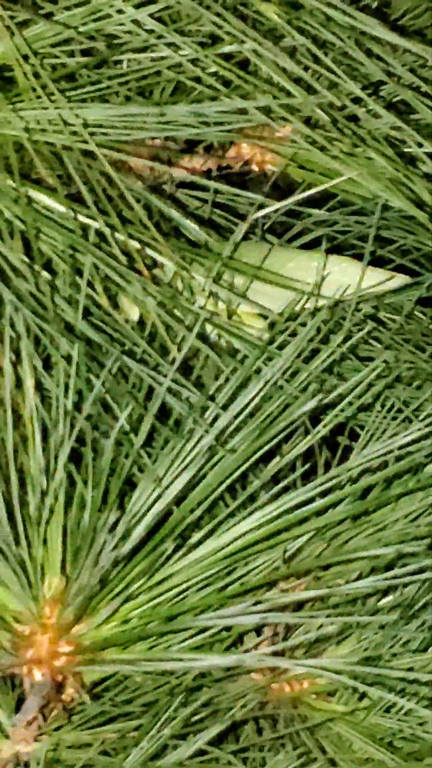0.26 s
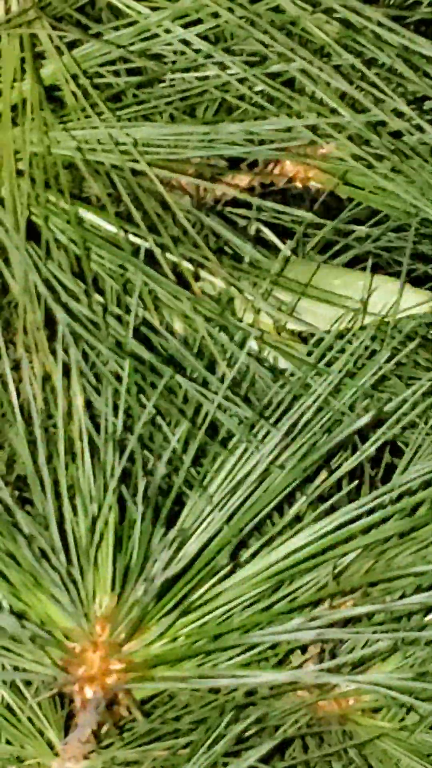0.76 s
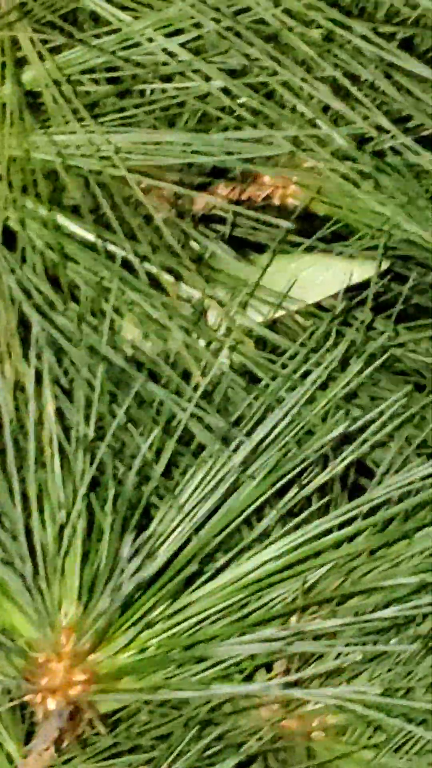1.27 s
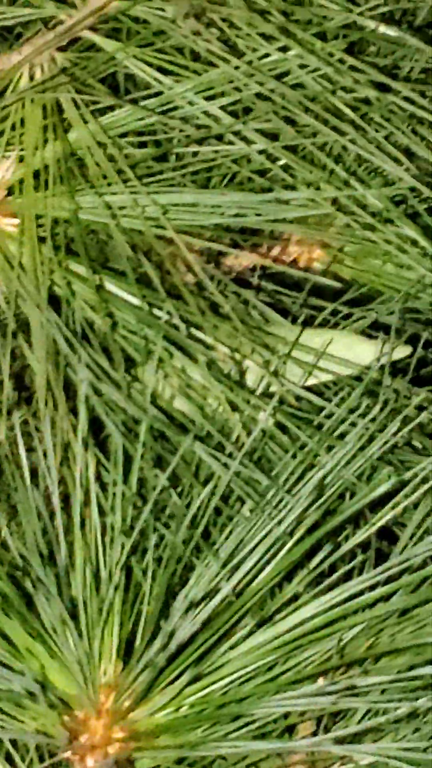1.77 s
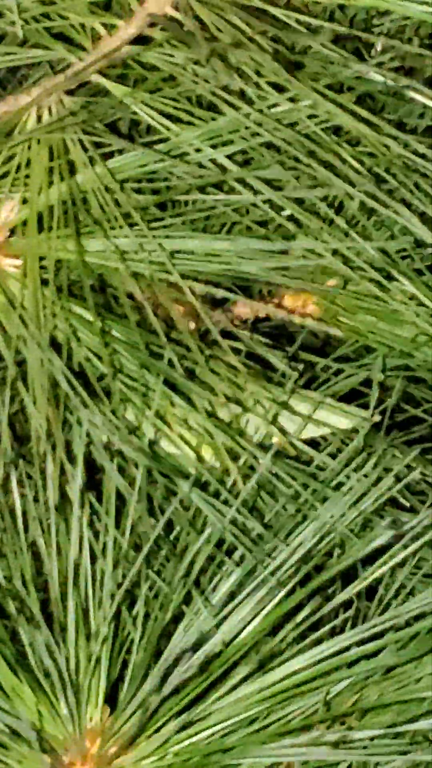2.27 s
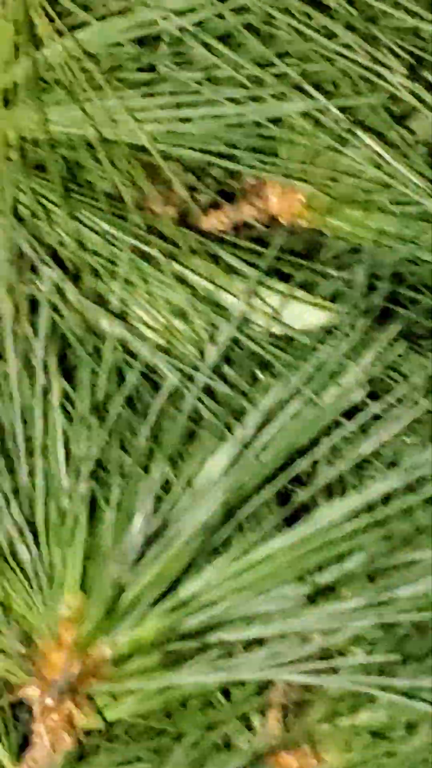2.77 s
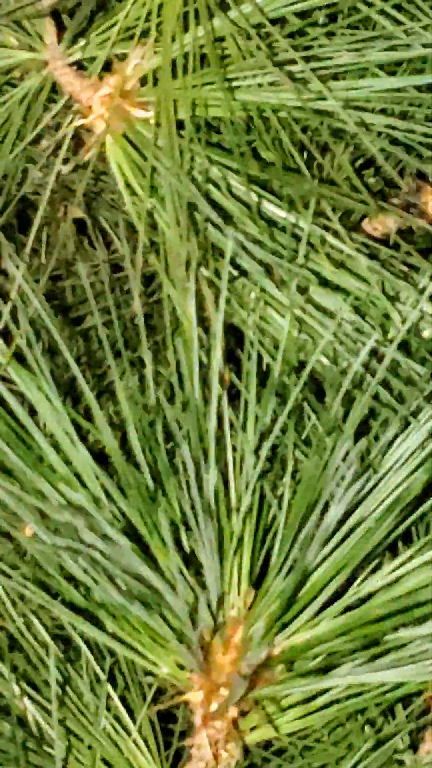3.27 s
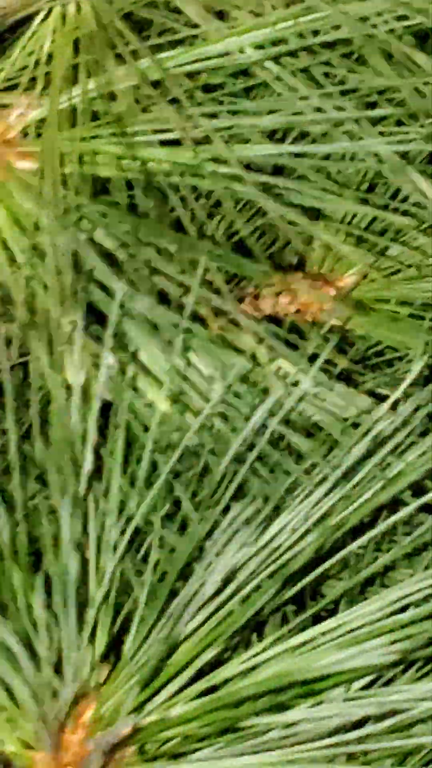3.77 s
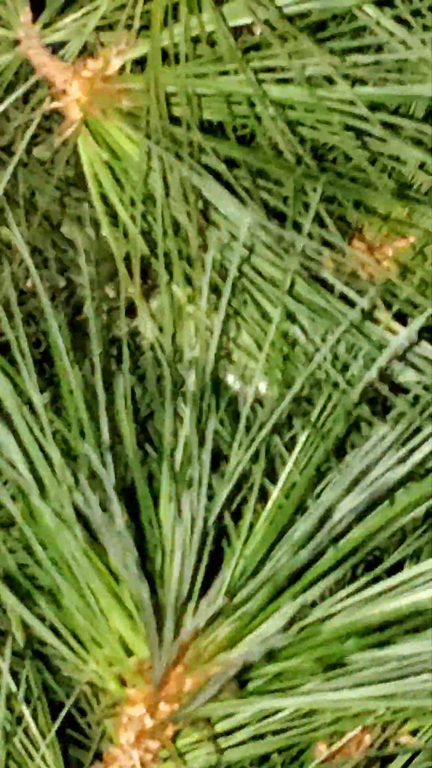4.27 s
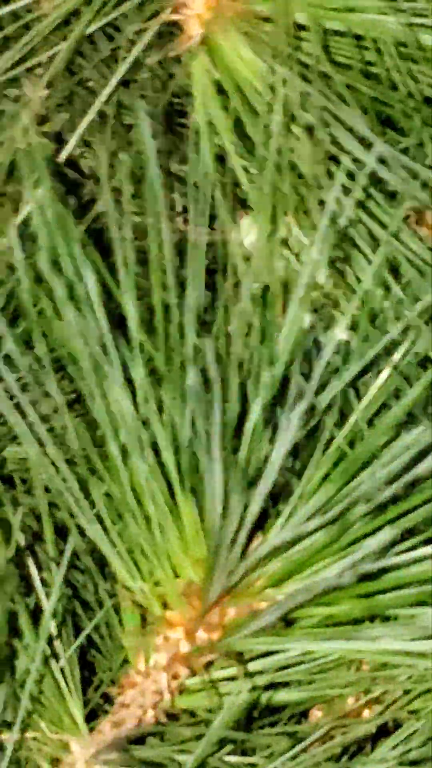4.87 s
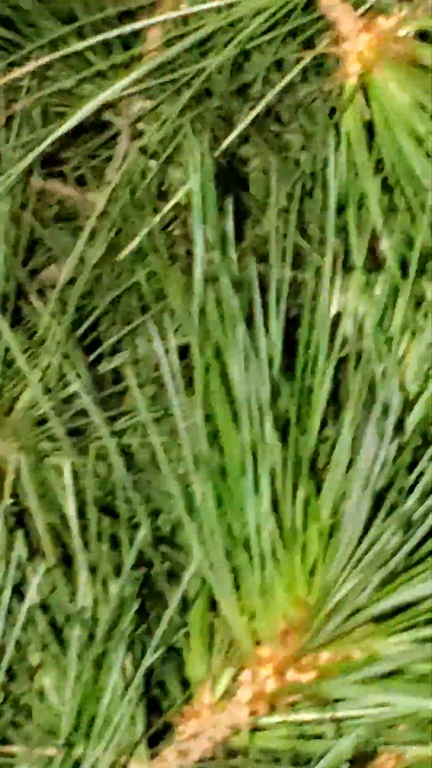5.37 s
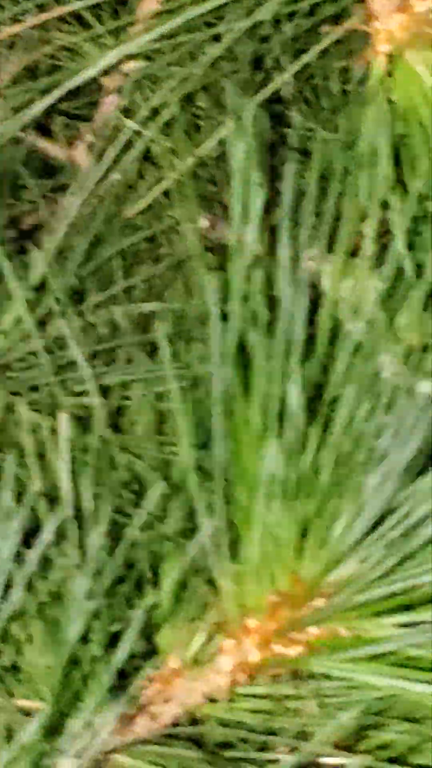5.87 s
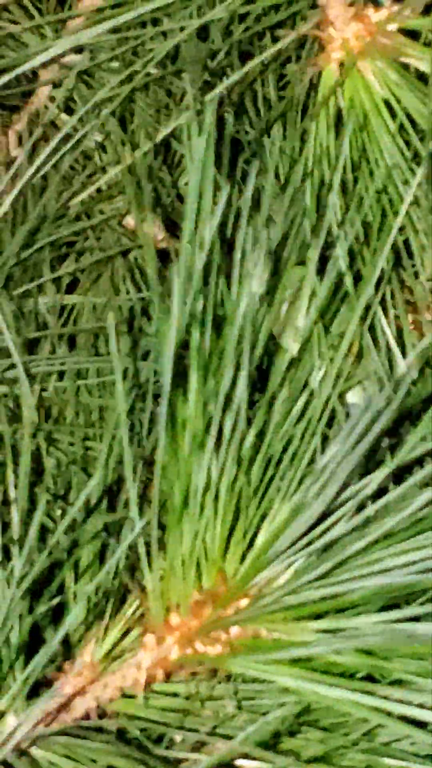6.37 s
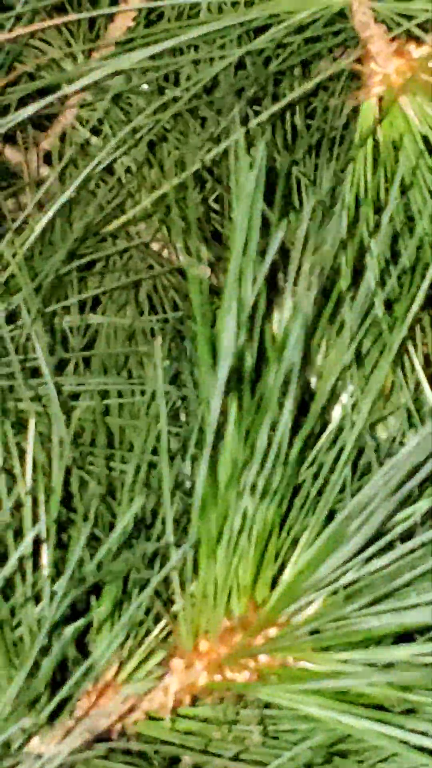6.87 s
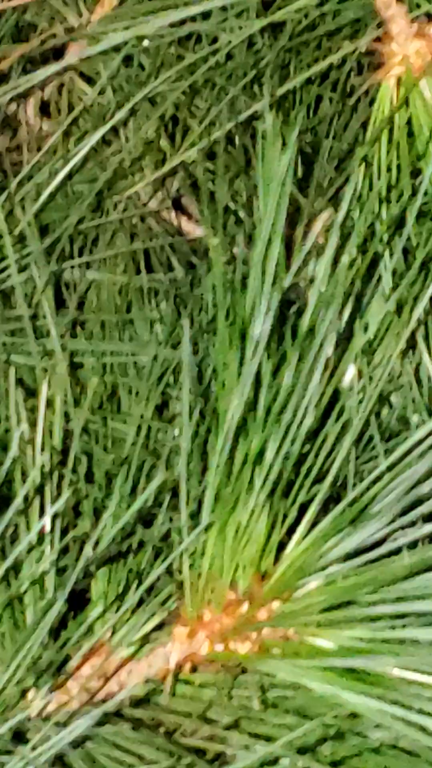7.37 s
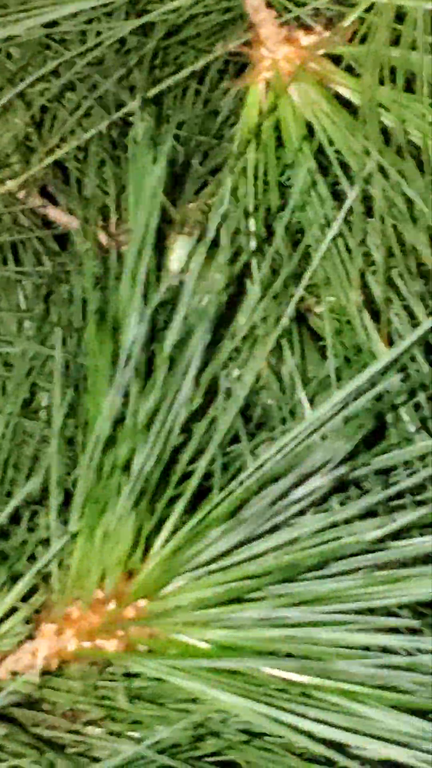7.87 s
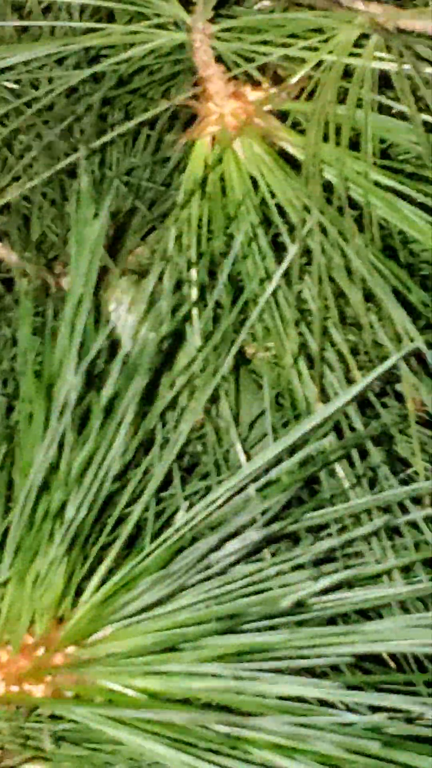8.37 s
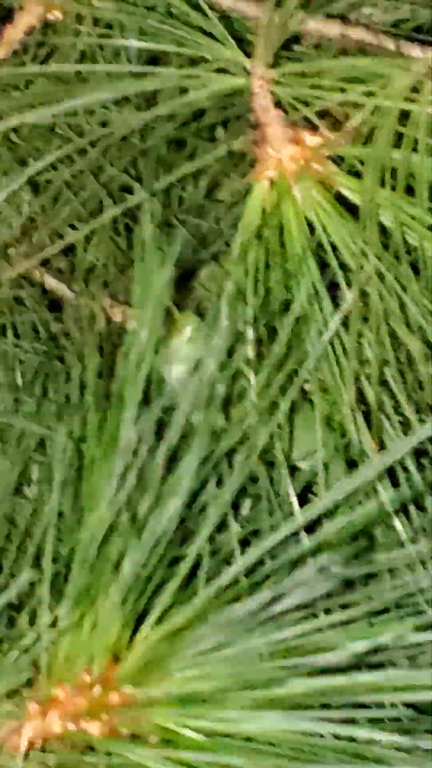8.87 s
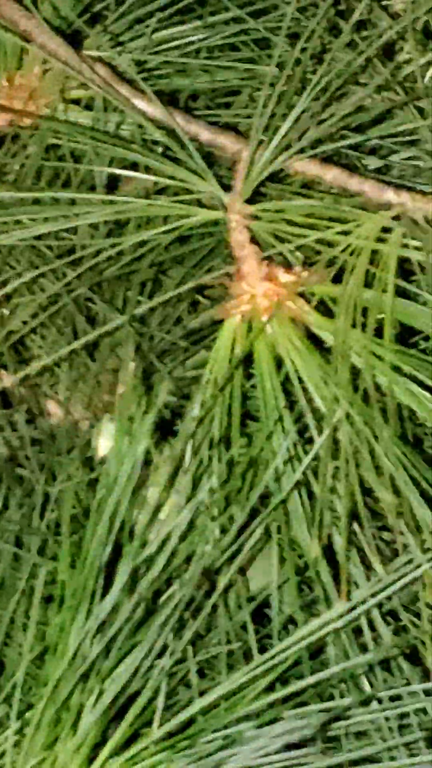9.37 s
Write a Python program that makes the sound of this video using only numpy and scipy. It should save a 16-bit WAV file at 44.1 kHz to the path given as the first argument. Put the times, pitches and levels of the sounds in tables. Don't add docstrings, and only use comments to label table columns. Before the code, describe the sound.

A phone held close to pine needles picks up a dense insect chorus: harsh two-beat katydid rasps from different sides, a fine buzzing trill to the left and tiny high chirps in even runs. Deep handling thumps are strongest at the start, followed by a short tap and a barely heard far horn. Soft insect hiss, a weak machine hum and low traffic drone lie behind, with light jolts returning later.

```python
import sys
import numpy as np
from scipy import signal
from scipy.fft import rfft, irfft, next_fast_len
from scipy.io import wavfile
from scipy.ndimage import uniform_filter1d, map_coordinates

SR = 44100
rng = np.random.default_rng(int(sys.argv[2]) if len(sys.argv) > 2 else 0)


def magnitude_from_level(level_db):
    exponent = np.asarray(level_db, float) / 20
    return 10 ** exponent


def file_out(sig):
    cols = np.atleast_2d(sig).T
    lim = np.clip(cols, -1, 1)
    pcm = np.round(lim * 32767).astype(np.int16)
    wavfile.write(sys.argv[1], SR, pcm)


N = 424683
TIME = np.arange(N) / SR


def unit(x):
    return x / np.sqrt(np.mean(x ** 2) + 1e-20)


def along(points, hz):
    f, v = np.transpose(points)
    return np.interp(np.log(hz + 1), np.log(f + 1), v)


def over_time(points):
    s, value = np.transpose(points)
    return np.interp(TIME, s, value)


def wobble(rate):
    knots = rng.standard_normal(int(N * rate / SR) + 4)
    return map_coordinates(knots, [TIME * rate])


def noise():
    return rng.standard_normal((2, N))


def filtered(x, response):
    m = next_fast_len(N + 8192)
    return irfft(rfft(x, m) * response(np.fft.rfftfreq(m, 1 / SR)), m)[..., :N]


def strokes(s, db, half_s):
    t = TIME[::100]
    swells = 1 / (1 + abs((t - s[:, None]) / half_s) ** 5)
    power = magnitude_from_level(2 * np.asarray(db)) @ swells
    return [np.interp(TIME, t, np.sqrt(p)) for p in power]


# frequency in Hz, left-right likeness.
LIKENESS = [(60, 0.98), (180, 0.99), (500, 0.6), (1050, -0.027), (1650, -0.26), (2000, 0.045),
            (3000, 0.0031), (15000, 0.013)]
# frequency in Hz, left over right in dB.
PORT_BALANCE = [(60, 2.5), (210, 4.5), (700, 4.5), (1400, 9), (2000, 7), (2600, 8), (3200, 11.5),
                (4000, 13), (5000, 5.5), (6400, 11), (7300, 3.5), (8400, 11), (10500, -5.5), (12000, -1.5),
                (13400, -4.5), (15000, -1.5)]


def coloured(pair, spectrum):
    m = next_fast_len(N + 8192)
    hz = np.fft.rfftfreq(m, 1 / SR)
    turn = np.arccos(np.clip(along(LIKENESS, hz), -1, 1)) / 2
    mid, side = rfft(pair, m) * magnitude_from_level(along(spectrum, hz)) * [np.cos(turn), np.sin(turn)]
    balance_db = along(PORT_BALANCE, hz)
    ports = irfft([mid + side, mid - side] * magnitude_from_level(balance_db * [[.5], [-.5]]), m)[:, :N]
    return ports / np.std(ports.mean(0))


def file_teeth(share, spread_db, echo, patchy_db):
    struck = rng.random((2, N)) < share
    strikes = struck * magnitude_from_level(spread_db * noise()) * rng.choice([-1, 1], (2, N))
    hz, _, z = signal.stft(unit(strikes) + echo * noise(), SR, nperseg=2048)
    field = uniform_filter1d(rng.standard_normal(z.shape), size=3, axis=1)
    field = uniform_filter1d(field, size=8, axis=2)
    depth_db = patchy_db / (1 + (hz[:, None] / 9000) ** 2)
    return signal.istft(z * magnitude_from_level(depth_db * unit(field)), nperseg=2048)[1][:, :N]


# first syllable in seconds,
# gap to the second in seconds, level of the first in dB, level of the second in dB.
LEFT_KATYDIDS = [(.13, .16, 1, 0.5), (.57, .14, -0.5, -1.5), (.97, 0.15, 1, 0.5), (1.3, 0.13, -6, -1),
                 (1.44, 0.12, -8, -2), (1.82, 0.16, 1, -1.5), (2.11, 0.12, -4, -5), (2.3, .16, -1, -2),
                 (2.74, 0.14, 1.5, 1.5), (3.21, 0.13, -1.5, -2.5), (3.61, 0.15, -0.5, 0.5),
                 (4.0, 0.13, 0.5, -2.5), (4.4, .16, -1, 0.5), (4.6, .13, -12, -7), (4.88, .15, -2.5, -3),
                 (5.29, 0.14, 0.5, -0.5), (5.63, .15, -16, -3.5), (5.92, 0.15, -4.5, -6),
                 (6.21, 0.14, -0.5, -1), (6.62, .14, -1, -4), (6.92, 0.12, -11, -4), (7.05, .13, -4, -0.5),
                 (7.46, 0.17, -4, -10), (7.6, 0.11, -3.5, -7), (7.92, .15, -1, 0.5), (8.38, .15, -0.5, -3),
                 (8.68, .15, -1, -1), (9.16, .13, -1.5, -2), (9.41, .16, 1, -1)]
RIGHT_KATYDIDS = [(-.13, .14, 0, 3), (.22, .13, -4, -0.5), (.75, .14, 3, 4.5), (1.18, 0.16, -2.5, -6),
                  (1.6, 0.15, 0.5, -1), (1.86, .11, -7, 4), (2.11, 0.17, 4.5, 1), (2.41, 0.13, -5, -2.5),
                  (2.81, .14, 1.5, 3), (3.22, .13, -5, -4), (3.62, .13, -2, -1), (4.02, 0.14, 3.5, 2.5),
                  (4.62, 0.15, 3.5, 0.5), (4.87, .13, -4, -19), (5.07, 0.098, -14, -0.5), (5.3, .14, 1, -6),
                  (6.05, .13, 0.5, 4), (6.48, .13, 0, -5), (6.95, 0.12, -8, -3), (7.19, .1, -3, -2.5),
                  (7.59, 0.23, -4, 1), (7.94, 0.17, -3, -7), (8.359, 0.14, 2, 1), (8.91, 0.11, -7, -5),
                  (9.08, .12, -12, -6), (9.375, .15, 4, 2)]
FAR_KATYDIDS = [(.43, 0.059, -10, -3.5), (1.29, 0.16, 0.5, -2.5), (1.72, .14, -3, -17),
                (2.39, .13, -3.5, -7), (2.9, 0.094, -2, -3.5), (3.46, 0.085, -5, -4.5), (3.73, 0.11, -9, 2),
                (4.02, .14, -11, -7), (4.56, 0.15, -4, 2), (5.33, 0.14, 1, 2.5), (5.61, 0.15, -3, -3),
                (6.04, 0.22, -2, -5), (6.45, .14, -3.5, -4.5), (6.76, 0.18, -17, -1.5),
                (7.1, 0.18, -1.5, -5.5), (7.57, 0.16, 1, 1.5), (7.92, 0.1, -8, -4), (8.33, 0.18, -1, 2.5),
                (8.91, 0.15, -1, -6.5), (9.07, .13, -6, 0), (9.34, .16, 0, -5)]
# frequency in Hz, level in dB per Hz.
MAIN_WING = [(2000, -25), (2550, -23.5), (2750, -7), (3000, 0.5), (3150, 2.5), (3400, -3.5), (3700, -6.5),
             (4000, -17), (4600, -51)]
LOW_NOTE_BAND = [(1300, -34.5), (1650, -21.5), (1850, -9), (2050, 2), (2200, -0.5), (2500, -3.5),
                 (2750, -10.5), (3300, -51)]
UPPER_WING = [(3200, -45), (3800, -10.5), (4000, -3), (4900, 1), (5050, 3.5), (5350, -2.5), (5900, -2.5),
              (6400, -10.5), (7000, -17), (7600, -18), (9000, -25), (10500, -54)]
HIGH_RASP = [(8000, -40), (9000, -19), (9700, -9), (10400, -7.5), (11000, 2), (12500, 6.5), (13600, 9),
             (15000, 11), (15900, 3)]
# main wing, low note, upper wing and high rasp in dB.
GROUP_DB = [
    (-48, -53, -51.5, -63),
    (-52, -60, -51.5, -60.5),
    (-49.5, -58, -48, -61),
]
# left over right beyond the ports' own, same four bands, in dB.
GROUP_SEAT_DB = [
    (3, 1.5, 5, 7),
    (-6, -1, -5, -3),
    (-6, 1, -3.5, -3),
]


def katydids():
    moments, efforts, members = [], [], []
    for k, calls in enumerate((LEFT_KATYDIDS, RIGHT_KATYDIDS, FAR_KATYDIDS)):
        first_s, gap_s, first_db, second_db = np.transpose(calls)
        moments += [first_s, first_s + gap_s]
        efforts += [first_db, second_db]
        members += [k] * (2 * len(first_s))
    s, effort_db = np.concatenate(moments), np.concatenate(efforts)
    bands_db = np.transpose(GROUP_DB)[:, members]
    seats_db = np.transpose(GROUP_SEAT_DB)[:, members]
    scrape = file_teeth(.1, 4.3, 1.11, patchy_db=3.5)
    out = 0
    for db, seat, colour in zip(bands_db, seats_db, (MAIN_WING, LOW_NOTE_BAND, UPPER_WING, HIGH_RASP)):
        port_db = effort_db + db + np.outer([.5, -.5], seat)
        out = out + strokes(s, port_db, half_s=0.043) * coloured(scrape, colour)
    return out


def cricket_wing(hz, width_hz, rate, sharp):
    gate = (.5 + .5 * np.cos(2 * np.pi * np.cumsum(rate) / SR)) ** sharp
    return unit(filtered(gate * noise(), lambda f: 1 / (1 + ((f - hz) / width_hz) ** 2)))


# time in seconds, level in dB.
TRILL_LEVEL = [(0, -49), (2.85, -49.5), (3.8, -55), (4.7, -58), (5.5, -50.5), (8.3, -61), (9.4, -59.5),
               (9.63, -64)]


def tree_cricket():
    wing = cricket_wing(5720, 130, 79 + 1.45 * wobble(2.5), sharp=0.93)
    return magnitude_from_level(over_time(TRILL_LEVEL) - 4.5) * magnitude_from_level([[3], [-3]]) * wing


# frequency in Hz, width in Hz.
GROUND_NOTES = [
    (8440, 150),
    (8180, 300),
    (7980, 130),
    (7350, 120),
]
# first chirp in seconds, last chirp in seconds, number of chirps.
CHIRP_RUNS = [
    [(.04, 1.745, 7), (2.035, 2.94, 4), (3.35, 5.63, 9), (5.91, 9.61, 14)],
    [(.1, 2.93, 10), (3.22, 5.95, 10), (6.3, 9.52, 11)],
    [(.12, 4.9, 14), (5.31, 6.09, 3), (6.54, 9.62, 9)],
    [(.44, 5.34, 11), (5.75, 9.33, 8)],
]
# level in dB, left over right in dB.
RUN_LEVELS = [
    [(-66, 7), (-66.5, 7), (-64.5, 5), (-63, -1)],
    [(-64, 15), (-67, 13), (-66, 12)],
    [(-72, -3), (-70, -6), (-68, -5)],
    [(-72, -3), (-69, -5)],
]


def ground_crickets():
    out = 0
    for (hz, width_hz), runs, levels in zip(GROUND_NOTES, CHIRP_RUNS, RUN_LEVELS):
        chirps = [(at, *level) for run, level in zip(runs, levels) for at in np.linspace(*run)]
        s, db, side_db = np.transpose(chirps)
        wing = cricket_wing(hz, width_hz, 86 + 4 * wobble(2.7), sharp=0.46)
        out = out + strokes(s, db + np.outer([.5, -.5], side_db), half_s=0.046) * wing
    return out


# time in seconds, level in dB.
HAND_UNREST = [(0.0, -27.5), (0.43, -29), (1.07, -37), (2.92, -42.5), (3.22, -46.5), (3.65, -44),
               (5.18, -45), (8.53, -44.5), (8.66, -44), (9.63, -43)]
# time in seconds, level in dB.
HAND_JOLTS = [(.22, -23.5), (.44, -31), (.66, -24), (1.05, -27), (1.16, -27), (1.32, -37), (1.62, -31.5),
              (1.8, -31.5), (1.95, -36.5), (2.19, -33), (2.31, -36.5), (2.43, -33.5), (2.76, -40),
              (2.94, -30.5), (3.47, -45), (4.57, -38), (5.69, -33), (7.55, -38), (7.66, -36.5), (7.74, -34),
              (8.07, -32), (8.21, -34), (8.29, -36), (8.66, -33.5), (8.83, -33.5), (9.17, -38.5),
              (9.34, -34)]
# frequency in Hz, level in dB per Hz.
CASE_RUMBLE = [(22, 0), (30, -18), (38, -13), (50, -2), (62, 4), (73, 1.5), (84, -1), (100, -3.5),
               (120, -9.5), (145, -20), (190, -23.5), (250, -64)]


def hand_rumble():
    shake = coloured(noise(), CASE_RUMBLE)
    grip = uniform_filter1d(shake.mean(0) ** 2, size=SR // 14)
    s, db = np.transpose(HAND_JOLTS)
    unrest = magnitude_from_level(over_time(HAND_UNREST) + 3.0 + 1.17 * wobble(9))
    hand = np.hypot(unrest, strokes(s, [db], half_s=0.03)[0])
    return hand * unit(shake / (abs(grip) + 0.06) ** .45)


# time in seconds, level in dB, frequency in Hz, half length in seconds.
FINGER_TAPS = [
    (2.2847, -27.5, 700, .0026),
    (2.28445, -36, 1950, .0018),
    (3.026, -49, 680, .02),
    (3.033, -51, 800, .008),
    (3.039, -46.5, 900, .012),
]


def finger_taps():
    taps, t = np.zeros(N + SR), np.arange(SR // 10) / SR
    for s, db, hz, half in FINGER_TAPS:
        swell = np.exp(-7 * ((t - half) / half) ** 2)
        start = round((s - half) * SR)
        taps[start:][:len(t)] -= magnitude_from_level(db) * swell * np.cos(2 * np.pi * hz * (t - half))
    return magnitude_from_level([[2.5], [-3.5]]) * taps[:N]


# frequency in Hz, level in dB per Hz.
ROAD_COLOUR = [(71, -40), (120, -4), (188, -8), (221, -4), (269, -9), (343, -9.5), (448, -12.5),
               (1300, -27), (1900, -30), (2470, -59), (4180, -120)]
# time in seconds, level in dB.
ROAD_LEVEL = [(0, -52.5), (3.2, -53.5), (5.3, -53.5), (7.0, -54), (9.63, -51.5)]


def far_road():
    level = magnitude_from_level(over_time(ROAD_LEVEL) + 3.5 + 0.73 * wobble(2.713))
    return level * coloured(noise(), ROAD_COLOUR)


def drifting_tone(hz, drift_hz):
    return np.sin(2 * np.pi * np.cumsum(hz + drift_hz * wobble(4)) / SR)


def far_horn():
    start_s, hold_s, edge_s = 2.45, 0.57, 0.05
    since = TIME - start_s
    blown = np.clip(np.minimum(since, hold_s - since) / edge_s + 1, 0, 1) ** 2
    level = magnitude_from_level(-52 - 8 * since + 0.73 * wobble(12.1))
    return magnitude_from_level([[1.5], [-1.5]]) * blown * level * drifting_tone(358, 1.724)


# frequency in Hz, level in dB.
MACHINE_NOTES = [
    (357, -63),
    (470, -72),
    (768, -80),
    (1006, -78),
]


def far_machine():
    whine = sum(magnitude_from_level(db + 2.2 * wobble(1.5)) * drifting_tone(hz, 3.02) for hz, db in MACHINE_NOTES)
    return magnitude_from_level([[1.5], [-1.5]]) * whine


# frequency in Hz, level in dB per Hz.
FAR_HISS = [(880, -45), (1500, -19.5), (2090, -4), (3130, 4), (3890, -5.5), (5760, 7), (6950, -16.5),
            (8370, -9), (10200, -21), (13500, -21), (15700, -20)]


def far_insects():
    return magnitude_from_level(-52 + 0.79 * wobble(1.48)) * coloured(noise(), FAR_HISS)


def scene():
    insects = katydids() + tree_cricket() + ground_crickets()
    hand = hand_rumble() + finger_taps()
    return insects + hand + far_road() + far_horn() + far_machine() + far_insects()


def low_pass(x):
    return signal.sosfilt(signal.butter(12, 16230, fs=SR, output="sos"), x)


def record(dry):
    offset, top_hz = 549, 15760
    hz, _, z = signal.stft(np.roll(dry, -offset, axis=1), SR, window="cosine", nperseg=2048)
    power = abs(z) ** 2
    around = uniform_filter1d(power, size=28, axis=1)
    margin_db = along([(500, -30), (1200, -9), (5200, -9), (6600, -5), (10500, -5), (12000, -9)], hz)
    kept = np.where(power > around * magnitude_from_level(2 * margin_db)[:, None], 1, .05)
    valley_db = along([(5500, -40), (6200, -18), (7500, -16), (8800, -10), (10600, -10.5), (11500, -20)], hz)
    near = uniform_filter1d(power, size=12, axis=1)
    far_around = uniform_filter1d(power.mean(0), size=160, axis=0)
    kept = kept * (near > far_around * magnitude_from_level(2 * valley_db)[:, None])
    quiet = signal.istft(z * kept, window="cosine", nperseg=2048)[1][:, :N]
    quiet = np.roll(quiet, offset, axis=1)
    mix = filtered(quiet, lambda f: (f < top_hz) / (1 + (30 / (f + 1)) ** 4))
    return low_pass(mix)


dry = scene()
out = record(dry)
file_out(out)
```